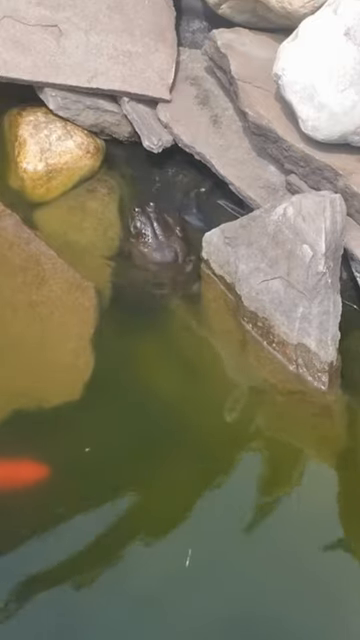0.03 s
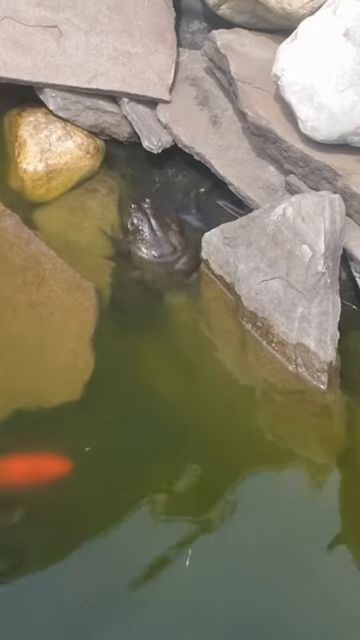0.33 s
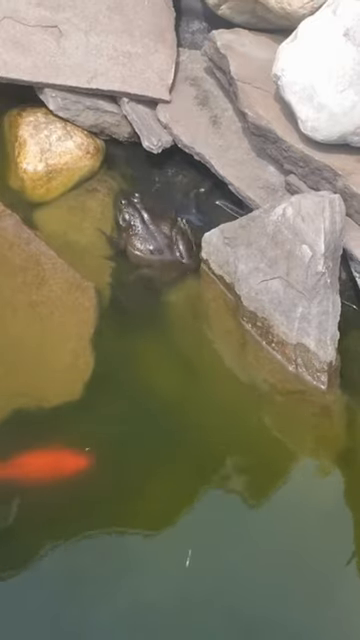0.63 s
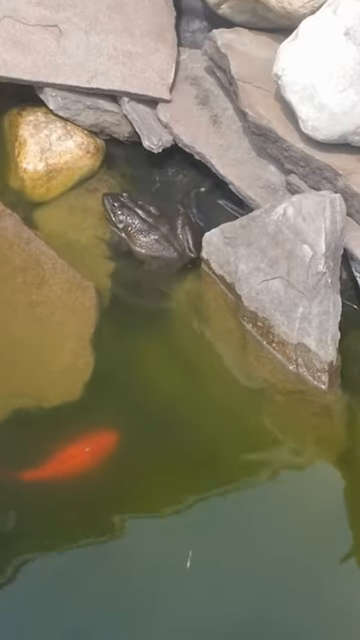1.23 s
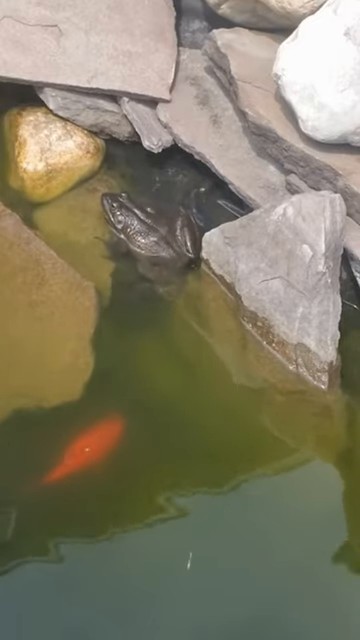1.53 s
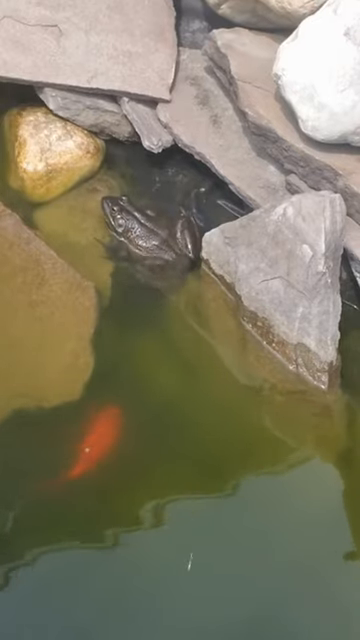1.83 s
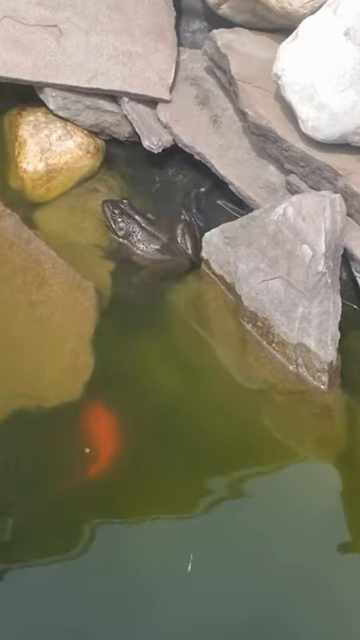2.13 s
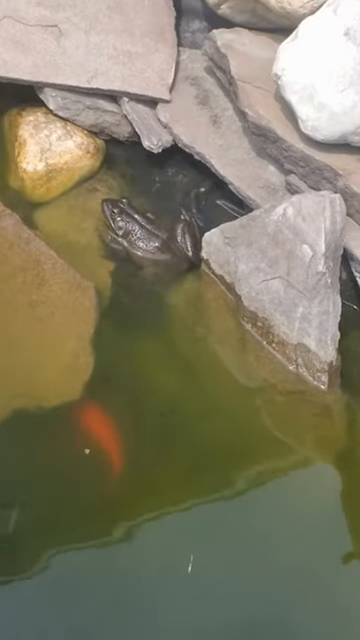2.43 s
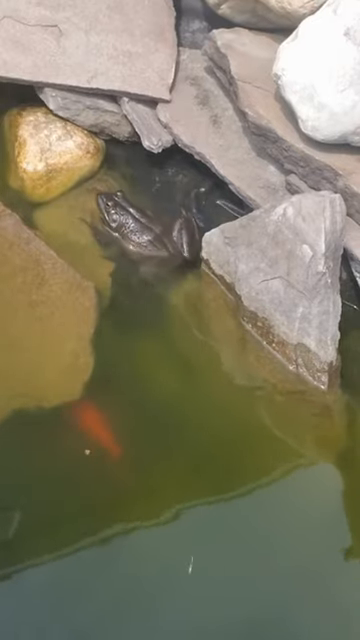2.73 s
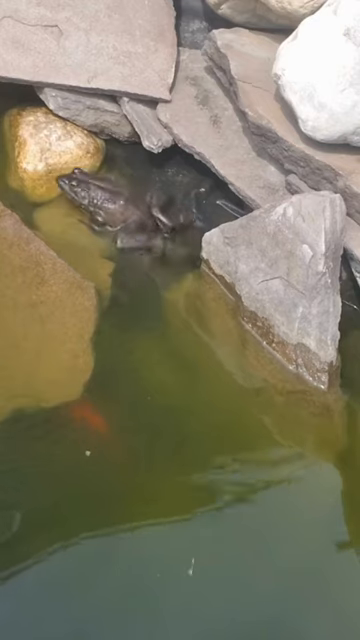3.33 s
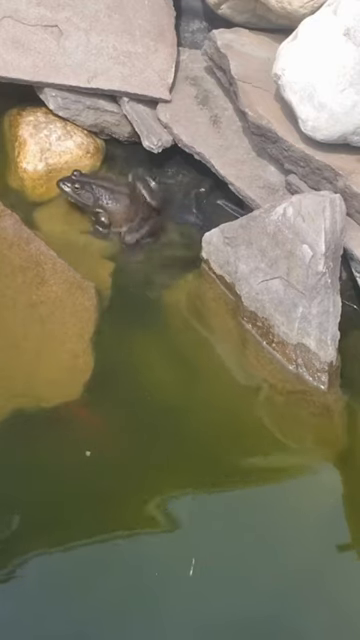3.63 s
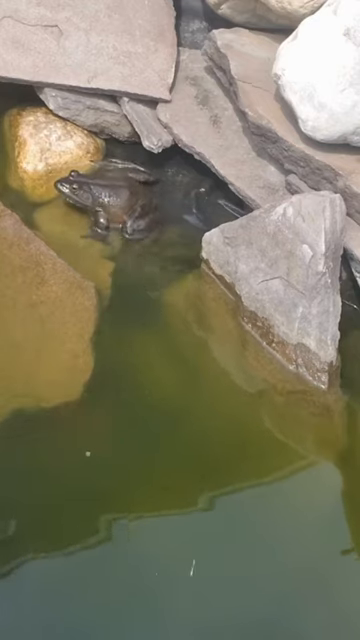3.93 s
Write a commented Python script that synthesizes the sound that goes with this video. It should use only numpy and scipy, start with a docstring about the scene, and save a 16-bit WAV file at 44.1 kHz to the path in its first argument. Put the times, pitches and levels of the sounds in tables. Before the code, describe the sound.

A songbird whistles three falling notes while another bird chirps hoarsely over soft outdoor hiss.

```python
"""A quiet garden pond. Open-air hiss, a low rumble and a distant engine's hum lie under everything.
A songbird gives three falling whistles, the first two followed by a soft low note; faint birds call afar.
Between the whistles another bird chirps, hoarse and raspy, ending on both sides of its syrinx at once.
A run of dry ticks passes over a faint rustle, wisps of far twitter follow, and the chirp comes again.
Near the end three tiny drops plip at the water's edge, each ringing as a small bubble."""
import sys
import numpy as np
from scipy import signal
from scipy.fft import rfft, irfft
from scipy.io import wavfile

SR = 44100
rng = np.random.default_rng(int(sys.argv[2]) if len(sys.argv) > 2 else 0)


def generate_wav(sig):
    """Save sig (samples, or channels by samples) to the path in sys.argv[1] as 16-bit PCM at SR."""
    pcm = np.round(np.clip(np.atleast_2d(sig).T, -1, 1) * 32767).astype(np.int16)
    wavfile.write(sys.argv[1], SR, pcm)


N = 176400
T = np.arange(N) / SR
BIN_HZ = np.arange(N // 2 + 1) * SR / N


def from_db(db):
    """Decibels to amplitude ratio."""
    return 10 ** (np.asarray(db) / 20)


def rms_one(x):
    """Normalisation to unit rms."""
    return x / np.sqrt(np.mean(x ** 2) + 1e-20)


def curves(rows, t):
    """Linear interpolation of each column over the times in the first."""
    times, *columns = np.transpose(rows)
    return [np.interp(t, times, column) for column in columns]


def gate(start, end, fade_s=0.0014):
    """A trapezoidal window between two times."""
    return np.clip((T - start) / fade_s, 0, 1) * np.clip((end - T) / fade_s, 0, 1)


def at_hz(points):
    """Interpolation over log frequency, at every Fourier bin."""
    hz, value = np.transpose(points)
    return np.interp(np.log(BIN_HZ + 1e-3), np.log(hz), value)


def coloured(x, colour):
    """Zero-phase filtering by a gain curve."""
    return irfft(rfft(x) * from_db(at_hz(colour)), N)


def drift(rate_hz):
    """Random fluctuation: low-passed noise of unit rms."""
    return rms_one(irfft(rfft(rng.standard_normal(N)) / (1 + (BIN_HZ / rate_hz) ** 2), N))


def noise(spectrum, correlation):
    """Partial coherence: the balance of mid and side noise sets the left-right correlation."""
    mid, side = rfft(rng.standard_normal((2, N)))
    alike = np.clip(correlation, -.99, .99)
    stereo = np.sqrt(1 + alike) * mid + np.sqrt(1 - alike) * side * [[1], [-1]]
    return rms_one(irfft(from_db(at_hz(spectrum)) * stereo, N))


def phase_of(hz, jitter, rate_hz):
    """Phase as the integral of frequency, which wavers by the fraction jitter."""
    return 2 * np.pi * np.cumsum(hz * (1 + jitter * drift(rate_hz))) / SR


def puff(centre_s, half_width_s, hz, db):
    """Band-limited noise under a Gaussian envelope."""
    bandpass = signal.butter(2, [hz / 1.25, hz * 1.25], "band", fs=SR, output="sos")
    band = signal.sosfilt(bandpass, rng.standard_normal((2, N)))
    return from_db(db) * rms_one(band) * np.exp(-((T - centre_s) / half_width_s) ** 2)


def panned(x, pan_db):
    """Interaural level difference, left minus right."""
    return x * from_db([[pan_db / 2], [-pan_db / 2]])


def garden(x, pan_db, wet_db, left_lag_ms=0):
    """Reflection: direct sound, a spray of echoes from stones, a wall's echo and a tail from trees."""
    spray_s, wall_delay_s, tail_t60_s = .022, .021, .5
    spray_db, wall_db, tail_db = -1.5, -7.5, -12
    t = T[:SR]
    spray = rng.standard_normal((2, SR)) * np.exp(-t / spray_s) * (t > .002)
    tail = rng.standard_normal((2, SR)) * from_db(-60 * t / tail_t60_s) * (1 - np.exp(-t / spray_s))
    response = (from_db(spray_db) * rms_one(spray) + from_db(tail_db) * rms_one(tail)) / np.sqrt(SR)
    scattered = signal.fftconvolve(x[None], response, axes=1)[:, :N]
    direct = np.array([np.interp(T - left_lag_ms / 1000, T, x), x])
    wall = from_db(wall_db) * np.array([np.interp(T - wall_delay_s, T, ear, left=0) for ear in direct])
    return panned(direct + from_db(wet_db) * (wall + scattered), pan_db)


# Spectrum of the hiss: frequency_hz, gain_db
AIR_SPECTRUM = [(150, -2.5), (270, -3), (380, -8), (800, -9.5), (1600, -16), (3300, -18.5), (5200, -29.5),
                (7700, -33.5), (8300, -41.5), (10500, -42.5), (13300, -35.5), (15700, -36)]
# Left-right coherence of hiss and rumble: frequency_hz, correlation
AIR_COHERENCE = [(60, 1), (130, 0.81), (260, 0.72), (550, -0.3), (1200, -0.46), (3000, -0.35), (7000, 0.36),
                 (13000, 1)]


def air():
    """Open air as broadband noise, partly coherent between the ears and slowly easing."""
    level_db, ease_db_per_s = -60, 0.58
    highpass = signal.butter(2, 110, "high", fs=SR, output="sos")
    hiss = signal.sosfilt(highpass, noise(AIR_SPECTRUM, at_hz(AIR_COHERENCE)))
    return rms_one(hiss) * from_db(level_db - ease_db_per_s * (T - T.mean()))


# Spectrum of the rumble: frequency_hz, gain_db
RUMBLE_SPECTRUM = [(20, -18), (33, -13), (45, 2.5), (60, 7), (76, 6.5), (92, 0.5), (115, -6), (160, -18),
                   (300, -67)]
# Its envelope: time_s, level_db
RUMBLE_ENVELOPE = [(0, -49.5), (.8, -53.5), (1.3, -50.5), (1.8, -52), (2.25, -53), (2.7, -52.5), (3.3, -53),
                   (4, -49.5)]


def rumble():
    """Low-frequency noise, whose long waves reach both ears nearly alike."""
    level_db, = curves(RUMBLE_ENVELOPE, T)
    return panned(from_db(level_db) * noise(RUMBLE_SPECTRUM, at_hz(AIR_COHERENCE)), pan_db=-1.5)


# Envelopes of the engine's strong harmonics: time_s, third_db, fourth_db
ENGINE_LOW_ORDERS = [(0, -50.5, -58), (.6, -55, -57), (1.3, -54, -59.5), (1.9, -52.5, -51.5),
                     (2.5, -63, -63.5), (3.0, -77, -56), (3.35, -70.5, -49.5), (4, -53, -58)]
# Its weak harmonics: order, level_db
ENGINE_HIGH_ORDERS = [(6, -71), (8, -75), (12, -74.5)]


def engine():
    """A distant engine sounds at harmonics of its cycle rate, each wavering in level."""
    cycle_hz, waver_db = 25.33, 2.63
    third_db, fourth_db = curves(ENGINE_LOW_ORDERS, T)
    phase = phase_of(cycle_hz, jitter=0.01157, rate_hz=1.43)
    hum = 0
    for order, db in [(3, third_db), (4, fourth_db)] + ENGINE_HIGH_ORDERS:
        amplitude = np.sqrt(2) * from_db(db + waver_db * drift(rate_hz=6.7))
        hum += amplitude * np.sin(order * phase + rng.uniform(0, 2 * np.pi))
    return panned(hum, pan_db=-1.5)


# Contour of one whistle: elapsed_s, pitch_hz, gain_db
WHISTLE_CONTOUR = [(0, 4700, -20), (.005, 3450, -8), (.010, 2970, -7), (.030, 2950, -4.5), (.044, 2600, -5),
                   (0.069, 2420, -2.5), (0.089, 2190, -8), (0.105, 1960, -14), (0.122, 1810, -12)]
# The three whistles: start_s, level_db, pitch_ratio
WHISTLES = [(-.004, -39, 1.032), (0.422, -39, 1.013), (0.867, -43, 1.04)]
# The microphone's treble resonances, applied to whistles and chirps: frequency_hz, gain_db
MIC_COLOUR = [(4800, -1), (6000, -7.5), (7900, 3), (9000, -10), (11500, 6), (14000, -36)]


def whistler():
    """A falling glide, nearly pure; its fourth harmonic shows as it slides through a resonance."""
    fourth_db, resonance_hz, half_width_hz = -21, 7900, 550
    song = 0
    for start, level_db, ratio in WHISTLES:
        hz, gain_db = curves(WHISTLE_CONTOUR, T - start)
        phase = phase_of(hz * ratio, jitter=.011, rate_hz=230)
        resonance = np.exp(-((4 * hz * ratio - resonance_hz) / half_width_hz) ** 2)
        tone = np.sin(phase) + from_db(fourth_db) * resonance * np.sin(4 * phase)
        song += tone * from_db(level_db + gain_db) * gate(start, start + WHISTLE_CONTOUR[-1][0])
    return garden(coloured(song, MIC_COLOUR), pan_db=2.5, wet_db=2.5, left_lag_ms=.13)


# Contour of a thin call, up and then down: elapsed_s, pitch_hz, gain_db
SEESAW_CONTOUR = [(0, 5500, -12), (.018, 5650, 0), (.075, 6200, -8), (.125, 6000, -40), (.15, 4850, -1),
                  (.21, 4500, -9)]
# The thin calls: start_s, level_db
SEESAW_CALLS = [(.118, -76), (.905, -75.5)]
# Calls blurred by distance: centre_s, half_width_s, centre_hz, level_db
BLURRED_CALLS = [(1.417, 0.025, 2690, -63.5), (1.99, 0.02, 1920, -64.5), (2.585, 0.049, 2270, -65.5)]


def far_birds():
    """Distance leaves faint gliding sinusoids and blurs other calls into bands of noise."""
    calls = 0
    for start, level_db in SEESAW_CALLS:
        hz, gain_db = curves(SEESAW_CONTOUR, T - start)
        tone = np.sin(2 * np.pi * np.cumsum(hz) / SR)
        calls += from_db(level_db + gain_db) * tone * gate(start, start + SEESAW_CONTOUR[-1][0])
    return garden(calls, pan_db=-5, wet_db=-6) + sum(puff(*call) for call in BLURRED_CALLS)


# A note after each of the first two whistles: start_s, length_s, first_hz, middle_hz, last_hz, level_db
SOFT_LOW_NOTES = [(0.189, 0.1285, 1742, 1724, 1616, -57), (0.625, 0.11, 1727, 1746, 1613, -56.5)]


def soft_low_notes():
    """Whistled pure tones that swell and fade under a half-sine envelope, sagging in pitch."""
    notes = 0
    for start, length, first, middle, last, db in SOFT_LOW_NOTES:
        progress = np.clip((T - start) / length, 0, 1)
        hz = np.interp(progress, [0, .5, 1], [first, middle, last])
        tone = np.sin(phase_of(hz, jitter=.011, rate_hz=300))
        notes += from_db(db) * np.sin(np.pi * progress) * tone
    return garden(notes, pan_db=-5, wet_db=-6)


# Arched first syllables, one list per chirp: time_s, pitch_hz, fundamental_db, octave_db
OPENING_SYLLABLES = [
    [(.586, 2157, -68, -47), (.598, 2180, -61, -43.5), (.612, 2300, -52, -39), (.624, 2520, -46, -56),
     (.642, 2320, -49, -74), (.684, 1960, -78, -47)],
    [(2.648, 2027, -71, -46), (2.662, 2247, -54, -44), (2.672, 2580, -53, -51), (2.686, 2750, -40, -54.5),
     (2.703, 2540, -45.5, -60), (2.722, 2304, -58, -61), (2.746, 1990, -66, -39)],
]
CHIRP_WAVER = dict(jitter=.024, rate_hz=400)


def opening_syllables():
    """A harmonic series on an arching pitch; a brief partial at 1.5 times the pitch makes it hoarse."""
    third_db, fourth_fifth_db = -29, -32
    croak_db, croak_s = -59, .022
    song = 0
    for rows in OPENING_SYLLABLES:
        start, end = rows[0][0], rows[-1][0]
        hz, fundamental_db, octave_db = curves(rows, T)
        phase = phase_of(hz, **CHIRP_WAVER)
        fundamental, octave = from_db(fundamental_db), from_db(octave_db)
        tone = fundamental * np.sin(phase) + octave * np.sin(2 * phase)
        overtones = from_db(third_db) * np.sin(3 * phase)
        overtones += from_db(fourth_fifth_db) * (np.sin(4 * phase) + np.sin(5 * phase))
        croak = from_db(croak_db) * np.exp(-((T - start) / croak_s) ** 2) * np.sin(1.5 * phase)
        song += (tone + (fundamental + octave) * overtones + croak) * gate(start, end)
    return song


# Husky onset of each syllable: centre_s, level_db
HUSK_BURSTS = [(.598, -56), (.692, -53.5), (2.655, -61), (2.757, -57)]
# Spectrum of the onsets: frequency_hz, gain_db
HUSK_SPECTRUM = [(800, -11), (2000, 6), (3300, 17.5), (5000, -11), (7500, -2.5), (10000, -11.5),
                 (15000, -18)]


def husk(half_width_s=.021):
    """Onset transients: a Gaussian burst of coloured noise opens each syllable."""
    envelope = sum(from_db(db) * np.exp(-((T - s) / half_width_s) ** 2) for s, db in HUSK_BURSTS)
    return envelope * rms_one(coloured(rng.standard_normal(N), HUSK_SPECTRUM))


# Rising second syllables, one list per chirp: time_s, lower_hz, lower_db, upper_hz, upper_db
CLOSING_SYLLABLES = [
    [(.685, 2600, -52, 2917, -42), (.692, 2870, -41.5, 3250, -43.5), (.701, 3390, -59, 3895, -38.5),
     (.713, 3550, -48, 4157, -51), (.724, 3490, -46, 3760, -48), (.736, 3380, -60, 3690, -47)],
    [(2.7495, 2750, -40, 3000, -39), (2.756, 3050, -43, 3300, -39.5), (2.763, 3530, -43, 3850, -46),
     (2.773, 3745, -36.5, 4270, -38), (2.783, 3770, -35.5, 4320, -36.5), (2.790, 3500, -42, 3950, -52)],
]


def closing_syllables(coupling_db=14):
    """Biphonation: the two sides of the syrinx beat, and their product gives a sum tone."""
    song = 0
    for rows in CLOSING_SYLLABLES:
        lower_hz, lower_db, upper_hz, upper_db = curves(rows, T)
        lower = from_db(lower_db) * np.exp(1j * phase_of(lower_hz, **CHIRP_WAVER))
        upper = from_db(upper_db) * np.exp(1j * phase_of(upper_hz, **CHIRP_WAVER))
        sum_tone = from_db(coupling_db) * lower * upper
        song += np.imag(lower + upper + sum_tone) * gate(rows[0][0], rows[-1][0])
    return song


def chirper(rasp_db=-9):
    """Fast random amplitude modulation roughens both syllables of each chirp."""
    song = opening_syllables() + closing_syllables()
    song *= 1 + from_db(rasp_db) * drift(rate_hz=400)
    return garden(coloured(song, MIC_COLOUR) + husk(), pan_db=-2, wet_db=-2, left_lag_ms=.13)


# Dry ticks: peak_s, level_db, decay_s
DRY_TICKS = [(1.141, -61.5, 0.01), (1.236, -62, 0.0036), (1.27, -56, 0.0032), (1.359, -60, .003),
             (1.474, -63, .007), (1.521, -61.5, .006), (1.616, -57.5, .0025), (1.670, -57, .0018),
             (1.727, -53.5, .003), (1.785, -56.5, 0.0026), (1.845, -52.5, .0012), (1.906, -56.5, 0.01)]
# The faint rustle under them: time_s, level_db
RUSTLE_ENVELOPE = [(0, -75.5), (1.05, -82.5), (1.35, -69), (1.92, -72.5), (2.05, -84), (3.0, -79),
                   (3.1, -69.5), (3.25, -76), (3.7, -110)]
# Spectrum of both: frequency_hz, gain_db
TICK_SPECTRUM = [(300, -0.5), (1200, 6), (3000, -2.5), (5000, -1), (7800, 5), (10000, -6.5), (13000, -3.5),
                 (16000, -3.5)]


def ticks():
    """Noise transients with exponential rise and decay over a rustle; soft ones lose their top."""
    attack_s, grain_db = .0026, 1.8
    hard_db, dull_hz = -62, 12900
    bursts = sum(from_db(db) * np.exp(np.minimum((T - peak) / attack_s, (peak - T) / decay))
                 for peak, db, decay in DRY_TICKS)
    rustle_db, = curves(RUSTLE_ENVELOPE, T)
    envelope = np.hypot(bursts, from_db(rustle_db + grain_db * drift(rate_hz=150)))
    bright = envelope * noise(TICK_SPECTRUM, correlation=.82)
    dull = signal.sosfiltfilt(signal.butter(1, dull_hz, fs=SR, output="sos"), bright)
    hardness = np.clip(envelope / from_db(hard_db), 0, 1)
    return panned(dull + hardness * (bright - dull), pan_db=4)


# Wisps of distant twitter: start_s, length_s, first_hz, last_hz, level_db
TWITTER_GLIDES = [(1.92, .04, 7150, 6950, -75), (2.10, .09, 4500, 2200, -75.5),
                  (2.38, .05, 5800, 5650, -81), (2.5, .045, 7000, 7150, -76)]


def twitter():
    """High glides from so far off that reflected sound outweighs direct sound."""
    calls = 0
    for start, length, first, last, db in TWITTER_GLIDES:
        progress = np.clip((T - start) / length, 0, 1)
        phase = phase_of(first + (last - first) * progress, jitter=.03, rate_hz=300)
        calls += from_db(db) * np.sin(np.pi * progress) * np.sin(phase)
    return garden(calls, pan_db=5, wet_db=8)


# Drops at the water's edge: start_s, level_db
WATER_DROPS = [(3.0704, -46.5), (3.106, -54), (3.1415, -63)]


def drops():
    """Bubble resonance: each drop rings for about a millisecond, rising in pitch; the water swishes."""
    bubble_hz, rise_hz_per_s, ring_s = 5900, 2100000, .00036
    plips = 0
    for start, db in WATER_DROPS:
        t = np.clip(T - start, 0, 20 * ring_s)
        envelope = from_db(db) * t / ring_s * np.exp(1 - t / ring_s)
        plips += envelope * np.sin(2 * np.pi * (bubble_hz + rise_hz_per_s * t / 2) * t)
    swish = puff(centre_s=3.115, half_width_s=.025, hz=1910, db=-70.5)
    return garden(plips, pan_db=6, wet_db=-6.5) + swish


def scene():
    """Superposition of everything heard at the pond's edge."""
    background = air() + rumble() + engine()
    return background + whistler() + far_birds() + soft_low_notes() + chirper() + ticks() + twitter() + drops()


def record(dry, cutoff_hz=15750):
    """Band limiting: an elliptic low-pass cuts the top steeply."""
    return signal.sosfilt(signal.ellip(12, .1, 70, cutoff_hz, fs=SR, output="sos"), dry)


dry = scene()
out = record(dry)
generate_wav(out)
```